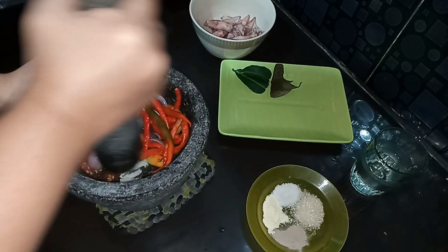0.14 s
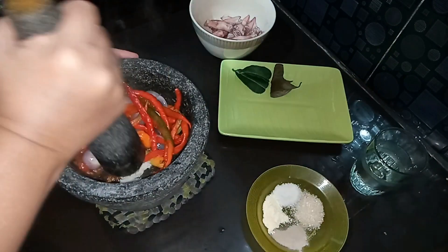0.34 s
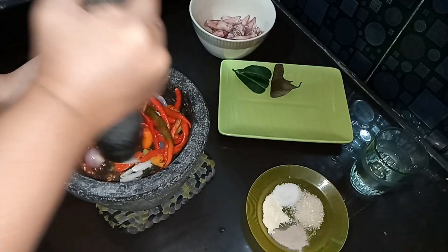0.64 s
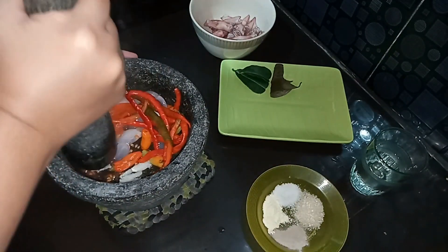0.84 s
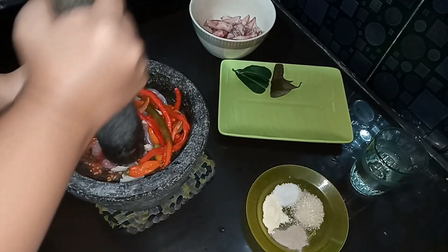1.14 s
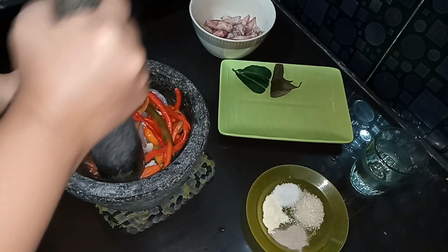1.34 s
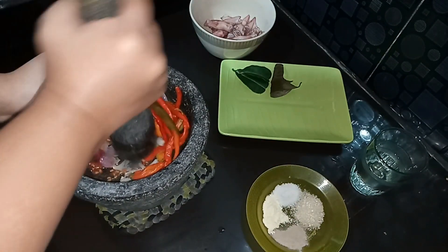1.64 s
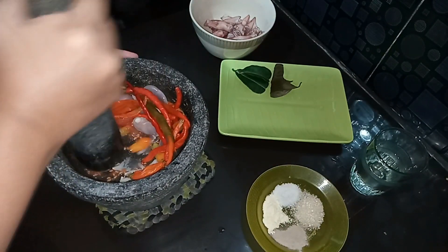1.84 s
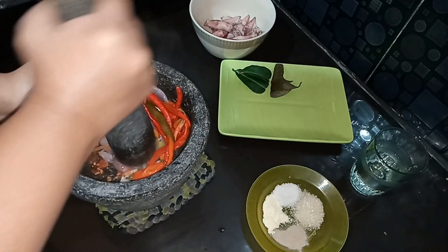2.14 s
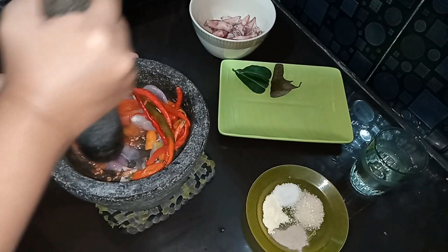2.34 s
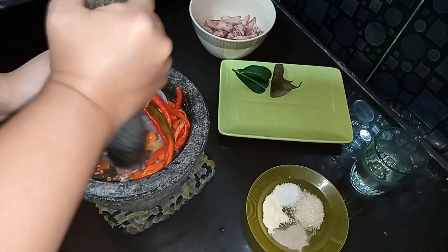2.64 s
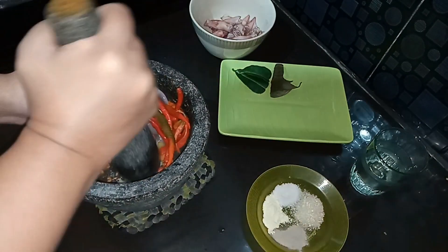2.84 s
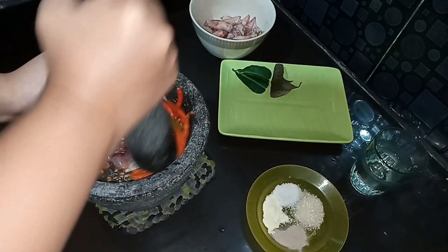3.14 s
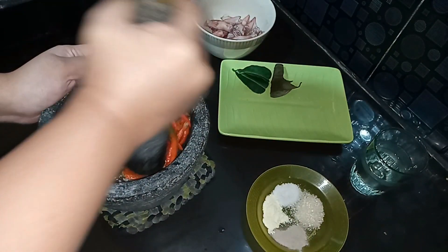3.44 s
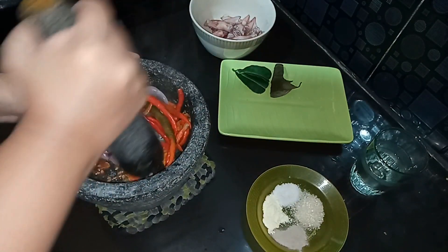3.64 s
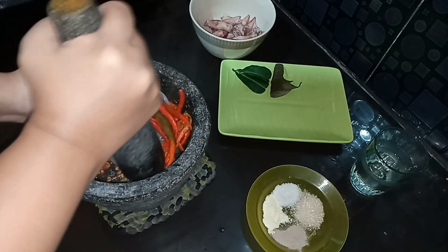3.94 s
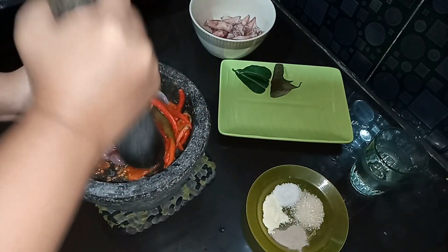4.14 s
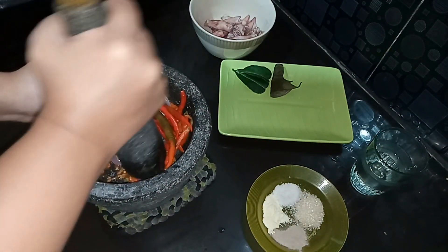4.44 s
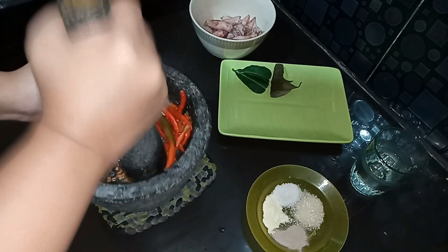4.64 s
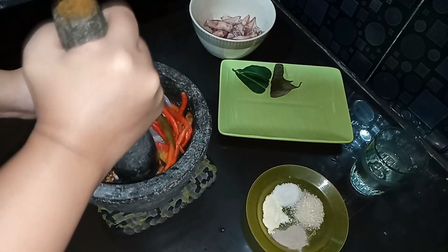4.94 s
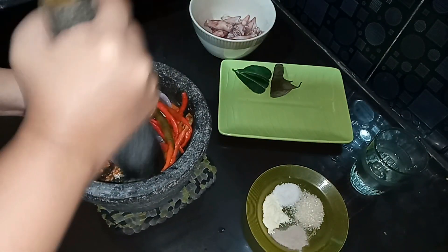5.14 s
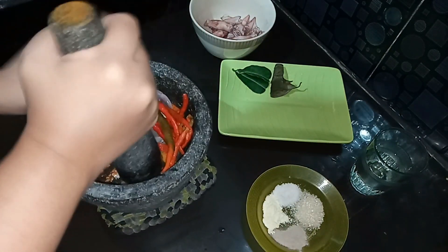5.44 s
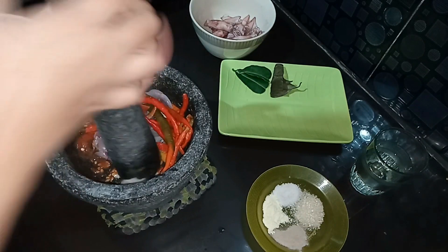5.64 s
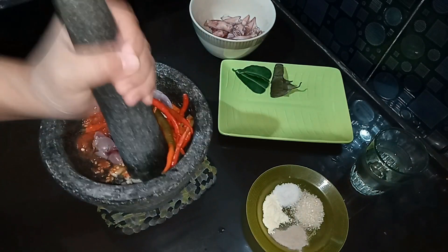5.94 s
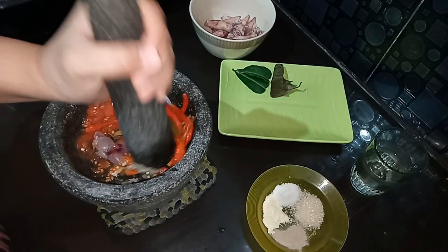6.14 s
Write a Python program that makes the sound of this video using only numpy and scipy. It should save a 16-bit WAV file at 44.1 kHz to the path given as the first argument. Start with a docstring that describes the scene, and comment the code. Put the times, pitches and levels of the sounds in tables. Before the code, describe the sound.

Loose gritty knocks and one dish clink in a stone mortar give way to strong, steady pestle blows, thudding through a kitchen counter.

```python
"""Pounding spices in a stone mortar

A stone pestle pounds chillies and spices on a kitchen counter, at first loosely, then hard and steady.
Each blow is a burst of stony noise, and its push sets the low modes of counter and room thudding.
Between blows the pestle grinds: clumps of random cracks over a rub of noise.
A glazed dish clinks and something hollow is knocked once, both as ringing modes; the room echoes.
A low murmur of appliances, made of shaped noise, drones and a brief hum, lies under it all."""
import sys
import numpy as np
from scipy import signal
from scipy.fft import rfft, irfft, next_fast_len
from scipy.io import wavfile

SR = 44100
rng = np.random.default_rng(int(sys.argv[2]) if len(sys.argv) > 2 else 0)


def transcribe(u):
    """Save the signal u as a 16-bit wav file named by the first command-line argument.

    u: samples, shape (n,) or (channels, n), limited to [-1, 1]; the rate is SR.
    q: integer samples, one column per channel.
    """
    v = np.clip(np.atleast_2d(u).T, -1, 1)
    q = np.round(v * 32767).astype(np.int16)
    wavfile.write(sys.argv[1], SR, q)


def gain_from_db(level_db):
    """Convert decibel levels to linear amplitude factors (20 dB per decade)."""
    decades = np.asarray(level_db, float) / 20
    return 10 ** decades


N = 277830   # length in samples

# pushes into the counter: (time [s], relative strength [dB], contact time [ms])
PUSHES = [(0.3131, -20, 9.8), (0.7581, -26, 0.77), (0.876, -20.5, 12.3), (1.351, -20, 13),
          (1.8261, -14, 16.2), (1.945, -30, 5.1), (3.1645, -17.5, 5.7), (3.874, -7.5, 13.9),
          (4.139, -9, 1.83), (4.3975, -7.5, 0.37), (4.6436, -12, 0.71), (4.911, -21.5, 7.8),
          (5.1427, -14.5, 1.4), (5.3969, -10.5, 0.65), (5.9181, -9.5, 0.56), (6.213, -15.5, 5.6)]
# stone contacts: (time [s], relative level [dB], body [dB], bright part [dB], crush time [ms])
STONE_CONTACTS = [(0.0315, -32, 2, -30, 7.3), (0.2024, -41, -18, -14, 2.8), (0.294, -27, 4, -16.5, 8.7),
                  (0.3114, -3, -7.5, -12, 6.4), (0.5256, -31.5, -19, -20, 8.4),
                  (0.7601, -11, 15, -5.5, 1.58), (0.866, -18, -6, -11, 5), (0.88, -21, 6, -10, 2.4),
                  (0.903, -15, 4, -8, 1.56), (0.981, -36, -14, -34, 3), (1.0272, -20, -5, -29, 7.2),
                  (1.062, -25, -3.5, -11.5, 3.8), (1.3446, -35.5, 2.5, -9, 6.2),
                  (1.4674, -35.5, -14, -12.5, 6.6), (1.531, -26, -5, -42, 11.5),
                  (1.5564, -36.5, 11.5, -5, 4.5), (1.6734, -43.5, -1, -6, 4), (1.8063, -29, -33, -21, 1.4),
                  (1.8176, -26.5, -18, -12, 4.5), (1.9106, -33.5, -18, -30, 4),
                  (1.938, -22.5, -6, -23, 7.9), (1.9662, -37, 11.5, -7, 4.3),
                  (1.984, -28.5, -3.5, -16.5, 7.3), (2.074, -33.5, -23, -14, 7.6),
                  (2.0984, -33, -5, -29, 5.8), (2.154, -25, -10, -25, 4.2), (2.1887, -34, 2.5, -33, 2),
                  (2.3135, -27, 4.5, -14.5, 4.1), (2.4018, -14.5, -8, -8, 1.3), (2.426, -28, 3, -33, 1.7),
                  (2.7571, -24.5, -4, -3.5, 9), (2.8117, -38.5, 11, -21, 5), (2.8494, -34, -5, -15, 3.8),
                  (2.9444, -34.5, -2.5, -21, 3.9), (2.9722, -22, -4.5, -18, 4),
                  (3.0016, -39, -14, -32, 3.5), (3.1575, -12, -5.5, -15, 7.4),
                  (3.2832, -33, -0.5, -11.5, 4.6), (3.494, -33, -13, -36, 4.4),
                  (3.505, -22.5, -9.5, -12, 7), (3.545, -40, -11, -4, 3.5), (3.6139, -31.5, -4, -13, 3.2),
                  (3.685, -34, 0, -22, 9.6), (3.8711, -5.5, -1.5, -11.5, 2.6),
                  (4.1383, -10.5, -3.5, -10.5, 3.3), (4.3982, 1, -6, -13, 1.97), (4.6416, -7, -2, -9, 2.7),
                  (4.9001, -13.5, -8, -15.5, 3.4), (5.1415, -6, -6, -7.5, 1.74),
                  (5.3943, -5.5, -2.5, -9, 2), (5.916, -7.5, -6, -13, 2.8), (6.1936, -27.5, -7, -29, 5.3),
                  (6.209, -13.5, -2.5, -11.5, 4.7)]
# dull, warm, sharp and bright part of the sound: (from [Hz], to [Hz])
SOUND_PARTS = [(760, 1300), (1300, 2600), (2600, 5000), (5000, 16000)]


def rms_one(x):
    """Scale a sound to an rms of 1."""
    return x / np.sqrt(np.mean(x ** 2) + 1e-20)


def at_hz(points, hz):
    """Read a curve at a frequency, along a logarithmic frequency axis."""
    points = np.array(points)
    return np.interp(np.log(hz), np.log(points[:, 0]), points[:, 1])


def coloured(x, spectrum):
    """Filter x with the gains of a spectrum."""
    size = next_fast_len(len(x))
    hz = np.maximum(np.fft.rfftfreq(size, 1 / SR), 1)
    return irfft(rfft(x, size) * gain_from_db(at_hz(spectrum, hz)), size)[:len(x)]


def band(x, low_hz, high_hz):
    """Steep band-pass filter."""
    return signal.sosfilt(signal.butter(3, [low_hz, high_hz], "band", fs=SR, output="sos"), x)


def low_pass(x, order, hz):
    """Keep what lies below hz."""
    return signal.sosfilt(signal.butter(order, hz, fs=SR, output="sos"), x)


def resonance(x, hz, width):
    """Narrow filter with a gain of 1 at its centre; width in Hz."""
    r = np.exp(-np.pi * width / SR)
    feedback = [1, -2 * r * np.cos(2 * np.pi * hz / SR), r * r]
    return signal.lfilter(np.array([1, 0, -1]) * (1 - r * r) / 2, feedback, x)


def ring(clicks, hz, t60):
    """Each unit click sets a sine of height 1 ringing; it falls by 60 dB in t60 seconds."""
    r, w = gain_from_db(-60 / (t60 * SR)), 2 * np.pi * hz / SR
    return signal.lfilter([0, np.sin(w)], [1, -2 * r * np.cos(w), r * r], clicks + 1e-18)


def drift(rate):
    """Slow random wander with a spread of 1; it keeps what is slower than about rate (Hz)."""
    r = np.exp(-2 * np.pi * rate * 40 / SR)   # one value per 40 samples
    noise = rng.standard_normal(N // 40 + 2002)
    slow = rms_one(signal.lfilter([1], [1, -2 * r, r * r], noise)[2000:])
    return np.interp(np.arange(N) / 40, np.arange(len(slow)), slow)


def swells(events, peak_s):
    """After each (time [s], level [dB]) a level rises, peaks after peak_s and fades; powers add."""
    t = np.arange(N) / SR
    total_power = 0
    for s, db in events:
        late = np.maximum(t - s, 0) / peak_s
        total_power = total_power + (gain_from_db(db) * late * np.exp(1 - late)) ** 2
    return np.sqrt(total_power)


def stone_body(x, ring_db):
    """The crunch colour with the stone's resonances standing out of it."""
    # colour of the crunch: (frequency [Hz], density [dB per Hz])
    crunch = [(240, -53.5), (400, -12), (545, 7.5), (765, -8), (2250, -4.5), (2430, -3.5), (2880, -6.5),
              (3530, -5), (4310, -13), (5600, -16.5), (6740, -18), (11900, -37), (16000, -36)]
    # resonances of the stone: (frequency [Hz], width [Hz], relative level [dB])
    stone = [(900, 250, 0), (1900, 400, -3), (2550, 400, -2), (3650, 700, 3), (4250, 400, -2),
             (6700, 800, 3), (8000, 700, 0)]
    plain = coloured(x, crunch)
    return plain + sum(gain_from_db(ring_db + db) * resonance(plain, hz, width) for hz, width, db in stone)


def four_parts(source, levels):
    """Dull, warm, sharp and bright part of a stony sound, each under its own envelope."""
    out = 0
    for (low_hz, high_hz), level in zip(SOUND_PARTS, levels):
        part = rms_one(band(source, low_hz, high_hz)) * level
        out = out + band(part, low_hz * .9, high_hz * 1.1)
    return out


def contacts():
    """Food is squeezed, then grit bursts out and dies away; returns bursts and clicks for the echoes."""
    levels, cracks = np.zeros((4, N + SR)), np.zeros((4, N))
    for s, db, body_db, bright_db, ms in STONE_CONTACTS:
        crush = ms * SR / 1000
        t = np.arange(-int(4 * crush), int(8 * crush)) / crush   # in crush times
        after = np.maximum(t, 0)
        burst = (1 - np.exp(-after / 0.073)) * np.exp(-after * 0.78)
        # weaker before full-bodied contacts, such as the one at the dish clink
        squeeze_db = -17.5 - 0.77 * max(body_db, -12)
        shape = burst + gain_from_db(squeeze_db) * np.exp(-abs(t) * 0.71)
        # the dull part lies under the warm one and swings more with the body
        dull_db = -4 + 1.23 * body_db
        parts = gain_from_db(db - 5.5 + np.array([[dull_db], [body_db], [0], [bright_db]]))
        start = max(round(s * SR) - int(4 * crush), 0)
        levels[:, start:start + len(t)] += parts * shape
        burst_size = np.sqrt(np.sum(shape ** 2))
        cracks[:, round(s * SR)] = parts[:, 0] * burst_size * rng.choice([-1, 1])
    grit = rng.standard_normal(N) * gain_from_db(0.99 * rng.standard_normal(N))
    bursts = four_parts(stone_body(grit, ring_db=-8.5), levels[:, :N])
    # the echoes are fed partly by one smooth click per contact, with the burst's energy in each part
    click = stone_body(np.eye(1, 2048, 64)[0], ring_db=-4.0)   # one click at sample 64
    smooth_clicks = 0
    for crack, (low_hz, high_hz) in zip(cracks, SOUND_PARTS):
        unit_click = rms_one(band(click, low_hz, high_hz)) / np.sqrt(2048)   # energy 1
        smooth_clicks = smooth_clicks + signal.fftconvolve(crack, unit_click)[64:64 + N]
    return bursts, smooth_clicks


def thuds():
    """Bell-shaped pushes ring counter and room; a long contact on soft food leaves only the lowest modes."""
    # modes of counter and room: (frequency [Hz], relative swing with its sign, t60 [s])
    counter = [(61.6, -0.127, 1.0), (71.5, -0.597, 0.34), (82.7, 0.268, 0.89), (87.7, -0.186, 1.0),
               (92.5, 1.0, 0.16), (103.9, -0.355, 1.0), (105.3, 0.77, 0.17), (121.0, -0.204, 0.47),
               (129.0, -0.359, 0.27), (143.4, -0.263, 0.28), (149.4, 0.904, 0.35), (155.2, -0.071, 1.0),
               (170.1, -0.093, 0.3), (179.9, -0.221, 0.4), (209.9, -0.426, 0.08), (215.7, 0.17, 0.71),
               (219.0, 0.146, 0.68), (242.0, -0.245, 0.23), (252.4, -0.2, 0.15), (308.9, 0.067, 0.46),
               (349.2, 0.033, 1.0), (389.4, -0.07, 0.12), (438.3, -0.089, 0.11)]
    force = np.zeros(N + SR)
    for s, db, ms in PUSHES:
        pulse = np.hanning(int(ms * SR / 1000) + 2)
        start = round(s * SR) - len(pulse) // 2
        force[start:start + len(pulse)] += gain_from_db(db) * pulse / pulse.sum()
    r = np.exp(-2 * np.pi * 900 / SR)   # the mat under the mortar softens the push above 900 Hz
    force = signal.lfilter([(1 - r) ** 2], [1, -2 * r, r * r], force[:N])

    t = np.arange(SR) / SR

    def dying_noise(low_hz, high_hz, db, t60):
        """Band of noise that falls by 60 dB in t60 seconds."""
        return rms_one(band(rng.standard_normal(SR), low_hz, high_hz)) * gain_from_db(db - 60 * t / t60)

    # higher modes crowd too close to tell apart, so noise stands for them
    dense = dying_noise(160, 687, -17, 0.84) * np.clip(t / 0.0016, 0, 1)
    dense += dying_noise(220, 1100, -8, 0.06)   # the mortar's own dull knock
    dense += dying_noise(232, 358, -15, 0.69) * np.clip(t / 0.025, 0, 1)   # the cupboard below blooms late
    higher = signal.fftconvolve(force, dense)[:N]
    return higher + sum(swing * ring(force, hz, t60) for hz, swing, t60 in counter)


def blow_times_and_levels():
    """The stronger contacts, as pairs (time [s], relative level [dB])."""
    return [(s, db) for s, db, *_ in STONE_CONTACTS if db > -16]


def grinding():
    """Seeds and skins crack in clumps under the pestle, over a rub of noise; blows end in a drag."""
    # pestle rubbing the bowl: (time [s], relative pressure [dB], brightness [dB per part])
    rubbing = [(0.0, -38, 2.5), (0.14, -49, 0.5), (0.46, -50.5, 9), (0.59, -51.5, -1), (0.81, -53.5, 0.1),
               (0.93, -47, 0.1), (1.19, -50.5, -7), (1.88, -58, 2.5), (2.03, -44, 3), (2.47, -65, 4),
               (2.72, -43.5, -1.2), (2.88, -47, 0.1), (3.02, -46.5, -0.7), (3.16, -47, -7),
               (3.26, -48.5, 2), (3.91, -52.5, -2.5), (4.09, -46.5, -0.5), (4.21, -58, -12),
               (4.49, -52.5, -2), (4.6, -54, -2), (4.91, -50, -0.5), (5.95, -52.5, 4.5), (6.12, -45.5, -2),
               (6.3, -46.5, 6)]
    # balance of the rub: dull, warm, sharp, bright, each (relative level [dB])
    rub_parts_db = [-11, -3, -5.5, -22.5]
    # balance of the drag: dull, warm, sharp, bright, each (relative level [dB])
    drag_parts_db = [-8, -1.5, -8.5, -15]
    sizes = gain_from_db(3.5 * np.minimum(rng.exponential(1, N), 5)) * rng.choice([-1, 1], N)
    cracks_per_s = 500 * gain_from_db(6 * drift(20))   # the wander makes the clumps
    cracks = sizes * (rng.random(N) < cracks_per_s / SR)
    source = rms_one(cracks) + rng.standard_normal(N)

    times, pressures, tilts = np.transpose(rubbing)
    pressure_db = np.interp(np.arange(N) / SR, times, pressures)
    brightness_db = np.interp(np.arange(N) / SR, times, tilts)
    rub = gain_from_db(pressure_db + np.c_[rub_parts_db] + np.c_[[-1.5, -.5, .5, 1.5]] * brightness_db)
    # after a blow the pestle drags out of the paste
    drags = [(s, -42.5 + 0.72 * db) for s, db in blow_times_and_levels()]
    drag = gain_from_db(np.c_[drag_parts_db]) * swells(drags, peak_s=0.071)
    # each part wanders as other bits come under the pestle
    wander = gain_from_db(2.0 * np.array([drift(2.92) for part in SOUND_PARTS]))
    return four_parts(stone_body(source, ring_db=-2.0), np.hypot(rub, drag) * wander)


def struck(events, modes, soft_hz):
    """Clicks, softened by the contact, ring a set of modes; the first tenth of a second is run-in."""
    clicks = np.zeros(N + SR // 10)
    share_db = rng.normal(0, 0.93, (len(events), len(modes)))   # each strike favours other modes
    at, db = np.transpose(events)
    places = np.round((at + .1) * SR).astype(int)
    out = 0
    for k, (hz, mode_db, t60) in enumerate(modes):
        clicks[places] = gain_from_db(db + mode_db + share_db[:, k]) * (-1) ** k
        out = out + ring(clicks, hz, t60)
    return low_pass(out, 2, soft_hz)


def dish_clinks():
    """A glazed dish rings in many short modes at each clink."""
    # clinks: (time [s], relative strength [dB])
    clinks = [(-.07, -20), (.7597, -9.5), (.9018, -23.5)]
    # modes of the dish: (frequency [Hz], relative level [dB], t60 [s])
    dish_modes = [(330, -10, .04), (560, -7, .02), (740, -7, .025), (861, -10, .06), (925, -10, .06),
                  (1060, -6, .02), (1314, -10, .02), (1572, -9, .025), (1880, -8, .03), (2370, -10, .04),
                  (2450, -9, .05), (2545, -10, .22), (2581, -8, .28), (2617, -5, .3), (2692, -8, .1),
                  (2765, -6, .05), (2865, -6, .04)]
    return struck(clinks, dish_modes, soft_hz=6050)


def hollow_knock():
    """Something hollow is knocked once and rings in low, short modes."""
    # modes of the hollow thing: (frequency [Hz], relative level [dB], t60 [s])
    hollow_modes = [(116, 0.5, 0.12), (156, 0, 0.19), (241, 2.5, 0.1), (355, 1, 0.11), (450, -1.5, 0.071),
                    (570, -2.5, 0.07), (660, 3, 0.045), (773, -0.5, 0.067), (858, 1.5, 0.082),
                    (950, 2, 0.051), (2570, 1.5, 0.042)]
    return struck([(1.5535, -22)], hollow_modes, soft_hz=2500)   # (time [s], relative strength [dB])


def kitchen(x, gap_ms):
    """Dense echoes of a tiled room: noise that grows in over gap_ms and dies at its own pace per half octave."""
    # echoes: (frequency [Hz], t60 [s], relative level [dB])
    echo_curve = np.array([(300, 0.6, -2.5), (990, 0.38, 2.5), (3400, 0.53, -2), (7400, 0.27, 0),
                           (9800, 0.34, -1), (15000, 0.25, 3)])
    t, white = np.arange(SR) / SR, rng.standard_normal((2, SR))
    echoes = 0
    for k, hz in enumerate(190 * 2 ** (np.arange(14) / 2)):
        level_db = at_hz(echo_curve[:, [0, 2]], hz) - 60 * t / at_hz(echo_curve, hz)
        noise = band(white[k % 2], hz / 2 ** .25, min(hz * 2 ** .25, 20000))
        echoes = echoes + noise * gain_from_db(level_db)
    echoes *= np.clip(t * 1000 / gap_ms, 0, 1)
    return signal.fftconvolve(x, echoes / np.sqrt(np.sum(echoes ** 2)))[:len(x)]


def murmur():
    """A low rumble that the pushes stir up, a faint hiss and drones; for a moment a wavering hum swells."""
    # colour of the murmur: (frequency [Hz], relative density [dB per Hz])
    murmur_colour = [(18, -32), (30, -6.5), (138, 0), (210, -9.5), (394, -12.5), (486, -14), (801, -29),
                     (1070, -12.5), (2060, -17), (3580, -21), (5450, -40.5), (6380, -43.5), (16000, -46)]
    # steady faint drones: (frequency [Hz], width [Hz], level [dB])
    drone_tones = [(201.8, 12.4, -55), (496.2, 14, -66.5)]
    # swells of the hum: (time [s], level [dB], width [s])
    hum_swells = [(3.0, -44.5, 0.046), (3.24, -34, 0.093), (3.47, -36.5, 0.033), (3.82, -39, 0.11)]
    noise = coloured(rng.standard_normal(N), murmur_colour)
    noise /= np.sqrt(np.mean(band(noise, 50, 300) ** 2))
    shake = swells([(s, -25 + db) for s, db, ms in PUSHES], peak_s=0.088)
    rumble = low_pass(noise, 4, 240) * np.hypot(gain_from_db(-45.5), shake)
    hiss = band(noise, 154, 20000) * gain_from_db(-52)

    white = rng.standard_normal(N)
    drones = 0
    for hz, width, db in drone_tones:
        narrow = resonance(resonance(white, hz, width), hz, width)
        drones = drones + gain_from_db(db) * rms_one(narrow)

    t = np.arange(N) / SR
    hum_hz = 99.6 * (1 + 0.017 * drift(5.9))
    swell = sum(gain_from_db(db) * np.exp(-.5 * ((t - s) / width) ** 2) for s, db, width in hum_swells)
    hum = np.sqrt(2) * swell * np.sin(2 * np.pi * np.cumsum(hum_hz) / SR)
    return rumble + hiss + drones + hum


def patchy(x, patchy_db, rate, shared_db):
    """Every third of an octave swells and fades by itself, and all rise and dip a little together."""
    edges = 40 * 2 ** (np.arange(27) / 3)
    size, shared = next_fast_len(N), shared_db * drift(12.6)
    hz, spectrum = np.fft.rfftfreq(size, 1 / SR), rfft(x, size)
    place = np.interp(np.log(hz + 1), np.log(edges), np.arange(27))
    out = 0
    for k in range(27):
        third = irfft(spectrum * np.clip(1 - abs(place - k), 0, 1), size)[:N]
        out = out + third * gain_from_db(shared + patchy_db * drift(rate))
    return out


def scene():
    """Near sounds, their echoes, the thuds and the background."""
    run_in = np.zeros(SR // 10)
    bursts, smooth_clicks = (np.r_[run_in, x] for x in contacts())
    dish, hollow = dish_clinks(), hollow_knock()
    # what feeds the echoes
    sent = gain_from_db(-8) * bursts + gain_from_db(-8.5) * smooth_clicks + gain_from_db(-1.5) * dish + gain_from_db(-12) * hollow
    # hand and pestle shift between blows, so the echoes change: three postures take turns
    shifts = [s + .1 - .03 for s, db in blow_times_and_levels()]   # .1 s run-in, .03 s ahead of the blow
    posture = np.searchsorted(shifts, np.arange(len(sent)) / SR) % 3
    echoes = sum(kitchen(sent * (posture == k), gap_ms=2.4) for k in range(3))
    near = (bursts + dish + hollow + echoes)[len(run_in):]
    background = patchy(grinding() + murmur(), patchy_db=3.0, rate=4.1, shared_db=2.0)
    return (near + thuds() + background)[None]


def roll_off(x):
    """The treble ends steeply here."""
    return signal.sosfilt(signal.butter(12, 16400, fs=SR, output="sos"), x)


def record(dry):
    """The microphone drops the deepest bass and rounds the peaks."""
    x = signal.sosfilt(signal.butter(2, 33.6, "high", fs=SR, output="sos"), dry)
    mix = 0.72 * np.tanh(x / 0.8)
    return roll_off(mix)


dry = scene()
out = record(dry)
transcribe(out)
```